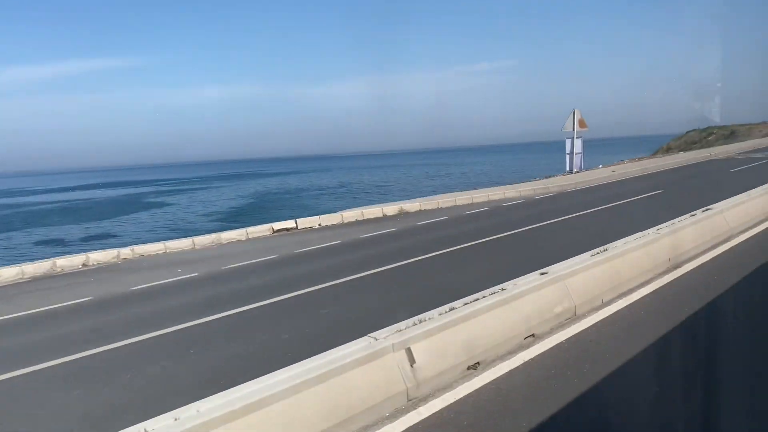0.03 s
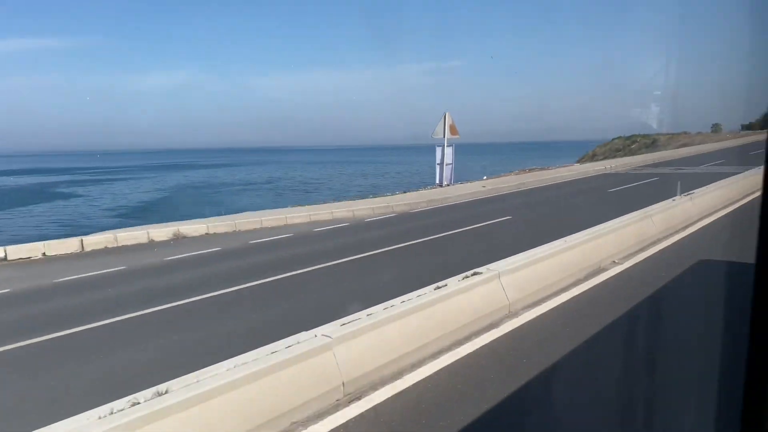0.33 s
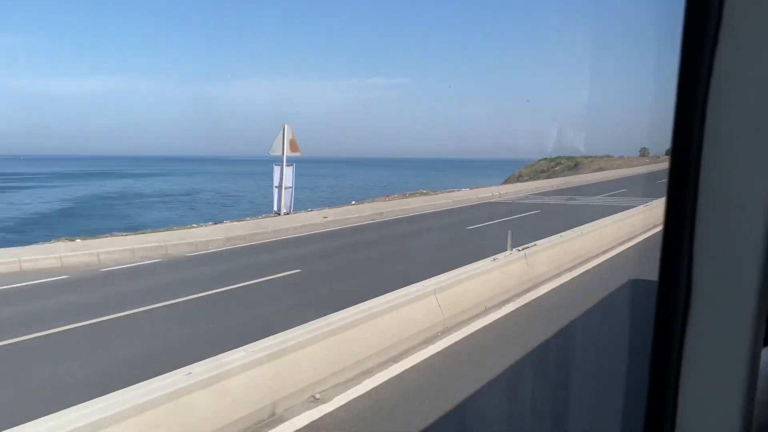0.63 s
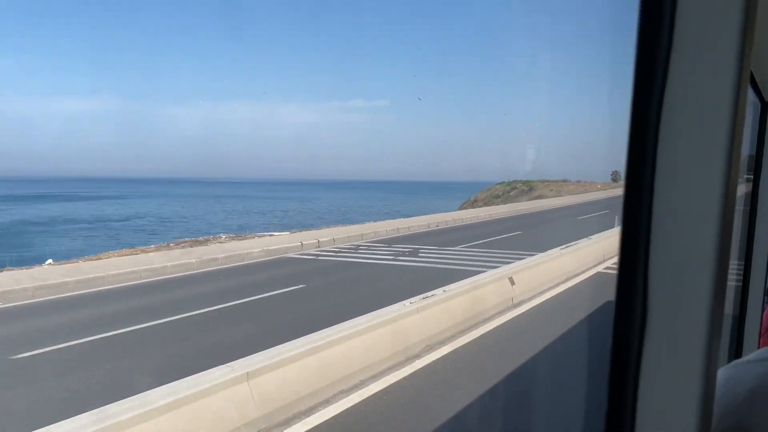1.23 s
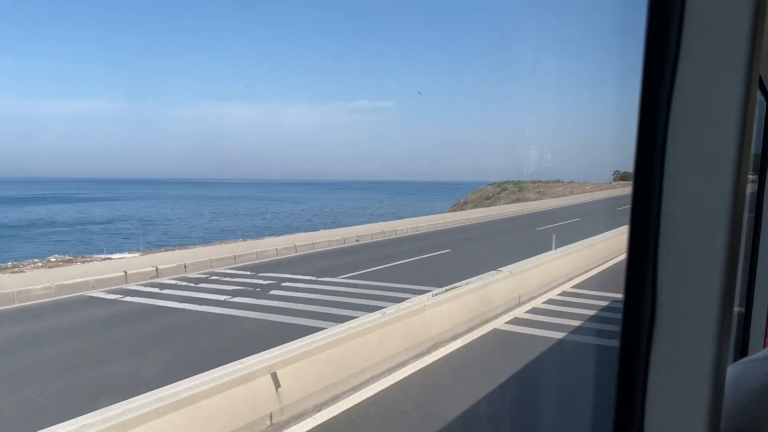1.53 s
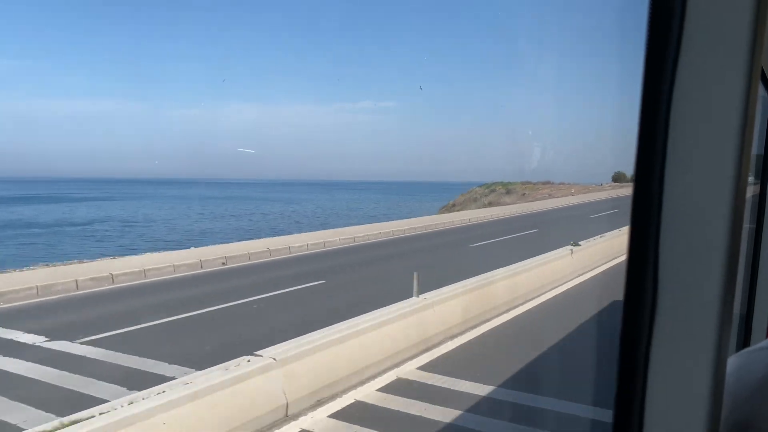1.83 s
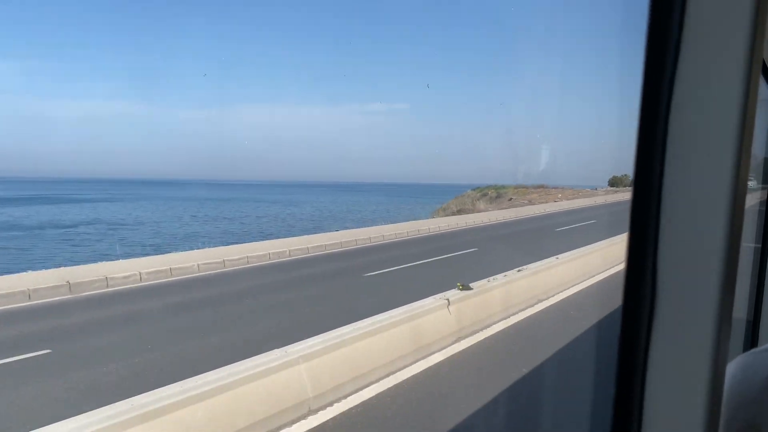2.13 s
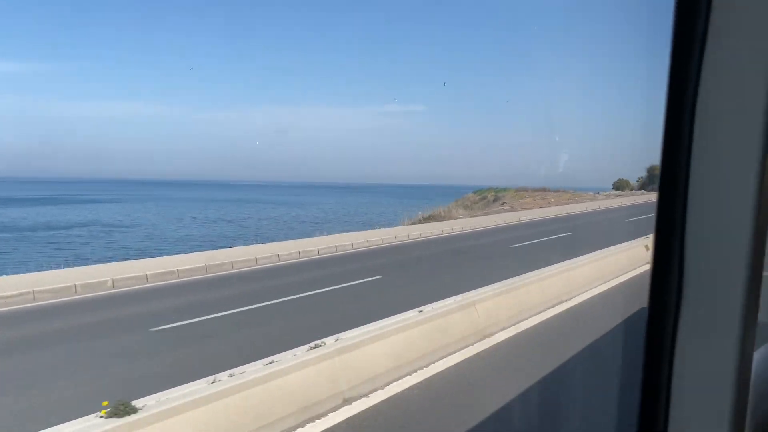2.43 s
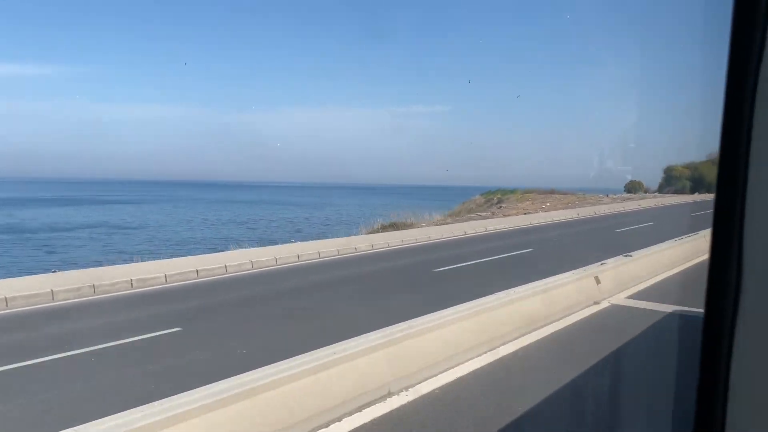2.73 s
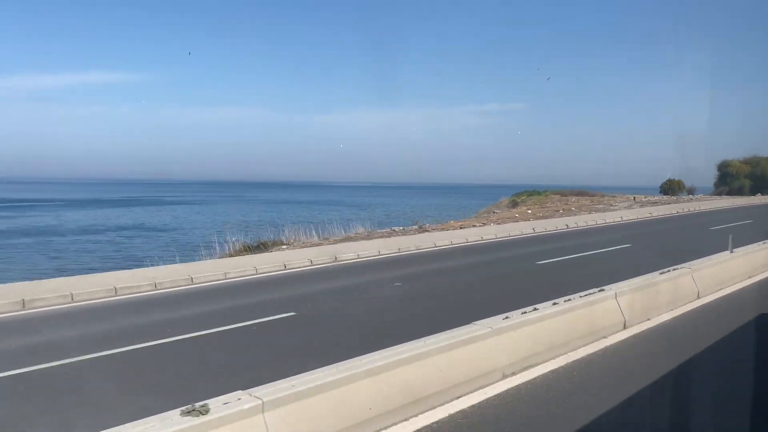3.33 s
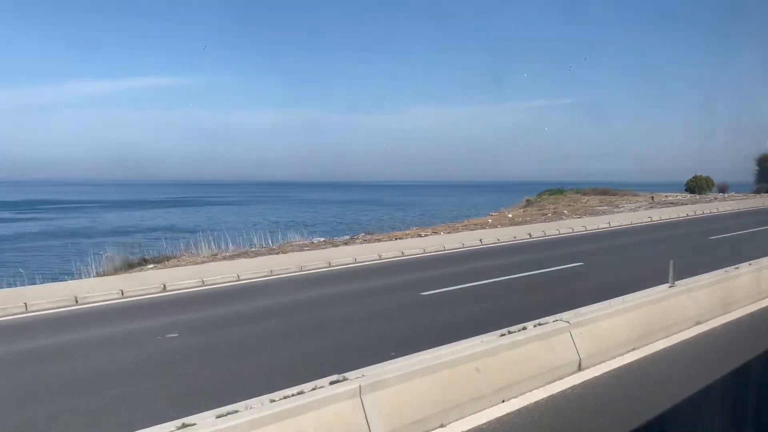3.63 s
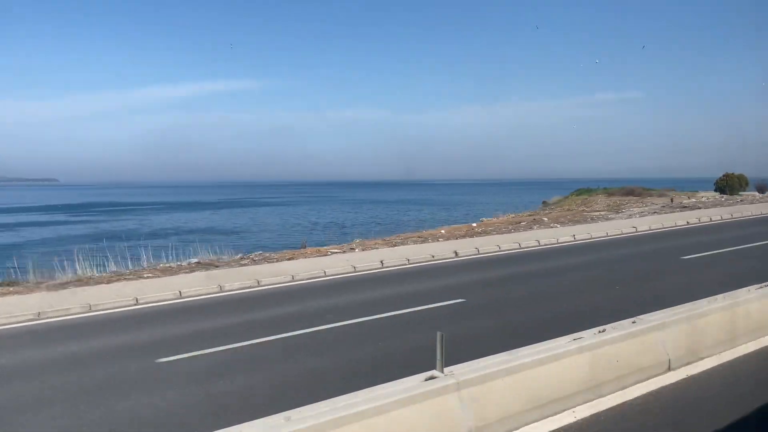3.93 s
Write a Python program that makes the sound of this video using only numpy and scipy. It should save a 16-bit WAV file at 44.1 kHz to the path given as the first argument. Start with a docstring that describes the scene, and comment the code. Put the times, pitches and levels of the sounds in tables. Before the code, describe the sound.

A deep bus rumble runs throughout, heard from inside, with tyre roar, window hiss and a faint, slightly sinking whine. From 0.5 to 1.1 seconds something rustles softly and air ruffles the microphone. Tyres growl from about 1.1 to 2.3 seconds, with low throbs and a brief panel rattle around 2. Another puff comes at 2.4. Trim ticks lightly on and off, with a tiny squeak near 3.4.

```python
"""A window seat in a bus slowing slightly on a coast road, stereo microphones. From the start the road
shakes the body into a deep boom, tyres roar, air hisses past the window and the driveline hums and whines,
sinking with the speed. In the first second something rustles close by, trim starts to tick and a draught
ruffles the left microphone. Then comes a rough patch: tyres growl, wheels throb, a loose panel buzzes.
After one more puff of air a faint upper whine comes in, and near the end a fitting squeaks."""
import sys
import numpy as np
from scipy import signal
from scipy.fft import rfft, irfft
from scipy.io import wavfile
from scipy.ndimage import uniform_filter1d

SR = 44100
rng = np.random.default_rng(int(sys.argv[2]) if len(sys.argv) > 2 else 0)


def generate_wav(signal):
    """Clip the signal to [-1, 1] and save it as 16-bit WAV at the path in sys.argv[1]."""
    frames = np.transpose(np.atleast_2d(signal))
    scaled = np.clip(frames, -1, 1) * 32767
    pcm = np.round(scaled).astype(np.int16)
    wavfile.write(sys.argv[1], SR, pcm)


N = 176400

# How hard the road shakes the body. Each row: time in seconds, level in dB.
ROAD_SHAKE = [(0, -22), (.5, -24), (.9, -22.5), (1.4, -20.5), (1.57, -22.5), (1.69, -21.5), (1.88, -18),
              (2.07, -18), (2.25, -20.5), (2.7, -22.5), (3.05, -20.5), (3.4, -17.5), (3.58, -19),
              (4, -23.5)]


def undb(db):
    """Decibels to gain."""
    return 10 ** (np.asarray(db) / 20)


def times():
    """Time of every sample in seconds."""
    return np.arange(N) / SR


def curve(rows):
    """Points joined by straight lines in time."""
    return np.interp(times(), *np.array(rows).T)


def over_hz(rows, column=1):
    """One column of a table spread over the frequency bins."""
    rows = np.array(rows)
    return np.interp(np.log(np.arange(N // 2 + 1) * SR / N + 1e-9), np.log(rows[:, 0]), rows[:, column])


def colour(x, spectrum):
    """Filter by a spectrum that falls away beyond its ends; rms 1."""
    (lo, lo_db), (hi, hi_db) = spectrum[0], spectrum[-1]
    closed = [(lo / 2, lo_db - 40)] + list(spectrum) + [(hi * 2, hi_db - 40), (hi * 8, hi_db - 100)]
    y = irfft(rfft(x) * undb(over_hz(closed)), N)
    return y / np.std(y)


def noise(channels=2):
    """Unrelated white noises."""
    return rng.standard_normal((channels, N))


def walk(rate):
    """Random levels held 1 / rate seconds and smoothed twice; spread near 1."""
    hold = int(SR / rate)
    steps = np.repeat(rng.standard_normal(N // hold + 1), hold)
    return 1.3 * uniform_filter1d(uniform_filter1d(steps, hold), hold)[:N]


def pan(db):
    """Left and right gains, the left higher by db."""
    return undb(np.array([[db], [-db]]) / 2)


def fade(start, decay):
    """A sudden start that dies away."""
    age = times() - start
    return (age >= 0) * np.exp(-np.abs(age) / decay)


def swell(centre, half_width):
    """A bell-shaped rise and fall."""
    return np.exp(-.5 * ((times() - centre) / half_width) ** 2)


def cabin_ripple(spacing_hz=21.91):
    """The uneven response of the cabin's many close resonances, smoothing out in the treble."""
    hz = np.arange(N // 2 + 1) * SR / N
    bumps = np.interp(hz / spacing_hz, np.arange(2000), rng.standard_normal(2000))
    depth_db = 3.5 * np.clip(hz / 500 - .5, 0, 1) / (1 + (hz / 4000) ** 2)
    return undb(depth_db * bumps)


def cabin_field(spectrum):
    """Noise as the two microphones hear it, partly shared and out of phase; their mean has rms 1."""
    # The pair in the cabin. Each row: frequency in Hz, left minus right in dB, coherence from 0 to 1,
    # left lead in radians.
    mic_pair = [(27.8, -3, 0.7, -2), (68, -6, 0.96, -0.64), (132, -9.5, .92, -0.8), (206, -13, 1, -2.1),
                (390, -4, 0.9, -1.5), (730, 1, 0.4, -3), (1240, -.5, 0.4, -5), (2000, -3.5, 0.2, -2.5),
                (3000, -2.5, 0.17, 0.5), (6000, 4, .15, 1.5), (12000, -5, .15, -2.5)]
    shared, separate = rfft(noise()) * cabin_ripple()
    tilt = undb(over_hz(mic_pair, column=1) / 2)
    coherence = np.clip(over_hz(mic_pair, column=2), 0, 1)
    lead = over_hz(mic_pair, column=3)
    left = tilt * (coherence * shared * np.exp(1j * lead) + np.sqrt(1 - coherence ** 2) * separate)
    sum_power = tilt ** 2 + tilt ** -2 + 2 * coherence * np.cos(lead)
    field = colour(irfft(np.array([left, shared / tilt]) / np.sqrt(sum_power), N), spectrum)
    return field / np.std(field.mean(axis=0))


def sizzle(whistle_hz=12000, flutter_hz=75):
    """A faint sizzle and a thin fluttering whistle that rise with the shaking."""
    # The sizzle's colour. Each row: frequency in Hz, density in dB.
    spectrum = [(6000, 4), (9000, -4), (11500, -1)]
    t, shake = times(), curve(ROAD_SHAKE)
    shake = shake - shake.mean()
    hiss = colour(noise(), spectrum) * undb(-81.5 + 2.3 * shake + 1.5 * walk(130))
    flutter = np.sin(2 * np.pi * flutter_hz * t + 2.2 * walk(45))
    whistle = flutter * np.sin(2 * np.pi * whistle_hz * t)
    return hiss + whistle * undb(-85 + .7 * shake + 2.5 * walk(40))


def squeak(at=3.372, hz=6500):
    """One tiny squeak of a fitting."""
    return undb(-55.5) * swell(at, 0.0073) * np.sin(2 * np.pi * hz * times() + .4 * walk(700))


def rustle():
    """Something soft brushes by close to the microphones, in fine grains with a few bright strokes."""
    # The soft rub. Each row: time in seconds, level in dB.
    rub_level = [(.45, -91), (.54, -59), (.68, -66), (.74, -57), (.85, -57), (.91, -58.5), (.98, -53),
                 (1.03, -55.5), (1.09, -80)]
    # Bright strokes. Each row: centre in seconds, half-width in seconds, level in dB.
    strokes = [(.54, .004, -70), (.585, 0.016, -72), (.66, 0.0091, -71), (0.807, 0.014, -67.5)]
    # Colours of rub and strokes. Each row: frequency in Hz, density in dB.
    rub_spectrum = [(900, 2.5), (2300, 3), (3500, -4), (5000, -6.5), (6500, -14.5), (8700, -16),
                    (10500, -24)]
    stroke_spectrum = [(6000, -14), (8600, 1), (9600, -5), (11000, -17)]
    rub = colour(noise(), rub_spectrum) * undb(curve(rub_level))
    stroke_gain = sum(undb(db) * swell(at, half_width) for at, half_width, db in strokes)
    bright = colour(noise(), stroke_spectrum) * stroke_gain
    grain = undb(1.5 * walk(180))
    return (rub + bright) * pan(-2) * grain


def trim(decay_s=0.0022, cabin_decay_s=0.018, contacts_per_s=1500):
    """Dry plastic ticks with a brief cabin tail, over the fine random chatter of the fittings."""
    # Trim ticks. Each row: start in seconds, level in dB, rough pitch in Hz, left minus right in dB.
    ticks = [(.693, -58, 4500, -8), (.963, -52, 2400, -1), (0.971, -56, 7000, 5), (1.427, -55.5, 6850, 7),
             (1.456, -64, 6500, 12), (1.556, -63, 6800, 11), (1.5898, -48.5, 5340, 6.5),
             (1.597, -55.5, 5460, 4), (1.68, -53.5, 5400, 3), (2.06, -54.5, 4400, 14),
             (2.0825, -51, 6070, 6), (2.4434, -46.5, 4400, -0.5), (2.447, -55, 5000, -4),
             (2.459, -63, 5000, 1.5), (2.529, -49.5, 5100, -2.5), (2.6452, -60, 8000, -9.5),
             (2.938, -55, 5830, -7), (2.946, -52, 5000, 1), (3.031, -45.5, 4600, 0), (3.037, -56, 5500, 5),
             (3.05, -57, 4480, 0), (3.78, -50.5, 4400, -2)]
    # Soft plastic dulls every tick. Each row: frequency in Hz, gain in dB.
    dulling = [(1000, 1.5), (8000, 1), (9500, -8.5), (11500, -23)]
    # The chatter's colour. Each row: frequency in Hz, density in dB.
    chatter_spectrum = [(2000, -9), (4000, 4.5), (7000, -1.5), (9000, -9), (11500, -24)]
    # Its rise and fall. Each row: time in seconds, level in dB.
    chatter_level = [(0, -77), (.4, -77), (.55, -72), (1.0, -72), (1.12, -92), (1.6, -76), (1.75, -71.5),
                     (2.08, -58.5), (2.38, -77.5), (2.5, -61.5), (2.7, -90), (3.05, -62.5), (3.2, -70.5),
                     (3.5, -64), (4, -74.5)]
    out, hiss = 0, colour(noise(), dulling)
    for at, db, hz, side_db in ticks:
        band = [(hz * 2 ** (k / 2), -3 * k * k) for k in (-1.5, 0.2, -1.03, 2.0, 0.5)]
        envelope = fade(at, decay_s) + undb(-12.5) * fade(at, cabin_decay_s)
        out = out + colour(hiss, band) * pan(side_db) * undb(db) * envelope
    contacts = (rng.random(N) < contacts_per_s / SR) * undb(2.5 * rng.standard_normal(N))
    rattle = signal.lfilter([1], [1, -np.exp(-1 / (decay_s * SR))], contacts)
    return out + colour(noise() * rattle, chatter_spectrum) * undb(curve(chatter_level))


def loose_panel(tail_s=.035):
    """A loose panel chafes in short bursts; each one sets its modes clinking."""
    # Bursts. Each row: centre in seconds, half-width in seconds, level in dB, left minus right in dB.
    bursts = [(2.048, .003, -42, 0), (2.085, .003, -37.5, 1), (2.176, .004, -44, -1)]
    # The chafing's colour. Each row: frequency in Hz, density in dB.
    spectrum = [(700, -7), (1170, 5), (1700, -5.5), (2450, 3), (2750, -13.5), (3200, -4.5), (3650, -18),
                (4100, -16.5), (6000, -31)]
    # The panel's modes. Each row: frequency in Hz, seconds to fall by 60 dB, level in dB.
    modes = [(2051, .043, -50.5), (2465, .035, -39.5), (3198, .04, -54.5)]
    push = sum(undb(db) * pan(side_db) * (swell(at, half_width) + undb(-10) * fade(at, tail_s))
               for at, half_width, db, side_db in bursts)
    out, t = push * colour(noise() + 0.46 * noise(channels=1), spectrum), times()
    for at, half_width, _, side_db in bursts:
        for hz, t60, db in modes:
            ring = np.where(t < at, swell(at, half_width), fade(at, t60 / np.log(1000)))
            phase = 2 * np.pi * hz * t + rng.uniform(0, np.pi / 2, (2, 1))
            out = out + undb(db) * pan(side_db) * ring * np.sin(phase)
    return out


def draught():
    """Short, fluttering puffs of air right on the left microphone."""
    # Puffs. Each row: start in seconds, length in seconds, level in dB.
    puffs = [(0.785, 0.15, -27), (0.953, 0.15, -27), (2.408, 0.079, -29.5)]
    # Their colour. Each row: frequency in Hz, density in dB.
    spectrum = [(40, -26), (100, 1), (240, 3.5), (380, -3.5), (600, -29.5), (1200, -34)]
    t = times()
    gate = sum(undb(db) * ((t > at) & (t < at + length)) for at, length, db in puffs)
    left = colour(noise(channels=1)[0], spectrum) * uniform_filter1d(gate, size=1500)
    return np.array([left * undb(2.6 * walk(28.3)), np.zeros(N)])


def window_air():
    """Air hisses past the window beside the seat, fluttering a little."""
    # The hiss's colour. Each row: frequency in Hz, density in dB.
    spectrum = [(700, -19), (1300, -1.5), (1600, 1), (1820, -3), (2020, 2), (2150, 0), (2340, 3), (2470, 3),
                (2620, 1.5), (2850, -1.5), (3200, -4), (3450, -7.5), (4900, -10), (5700, -17),
                (6600, -19.5), (8500, -29.5), (11000, -42.5)]
    # Its rise and fall. Each row: time in seconds, relative level in dB.
    level = [(0, -55), (.5, -57), (1.0, -55.5), (1.13, -58), (1.7, -55.5), (2.35, -56.5), (2.55, -56),
             (2.8, -55.5), (3.4, -54), (4, -57)]
    return cabin_field(spectrum) * undb(curve(level) - 1.12 + 1.3 * walk(25))


def tyre_roar():
    """The tyres roar on the road, heard from inside."""
    # The roar's colour. Each row: frequency in Hz, density in dB.
    spectrum = [(250, -13), (450, -0.5), (540, -14.5), (595, 4.5), (660, -3), (770, 2.5), (850, -2),
                (935, 0.5), (1060, -5), (1185, -2.5), (1250, -6.5), (1330, -5.5), (1500, -12),
                (1700, -17.5), (2500, -29)]
    # Its rise and fall. Each row: time in seconds, relative level in dB.
    level = [(0, -44), (.5, -44.5), (.72, -42.5), (.8, -45.5), (1.3, -46.5), (2.05, -45.5), (2.4, -46),
             (2.8, -47.5), (3.3, -45), (3.8, -49.5), (4, -50)]
    return cabin_field(spectrum) * undb(curve(level) - 1.5 + 1.4 * walk(30))


def coarse_asphalt():
    """The tyres growl over a stretch of rougher surface."""
    # The growl's colour. Each row: frequency in Hz, density in dB.
    spectrum = [(240, -9.5), (340, 5), (420, 2.5), (490, 3), (550, -2), (620, -1.5), (800, -1.5),
                (1000, -15), (1400, -22)]
    # Its rise and fall. Each row: time in seconds, level in dB.
    level = [(1.0, -56), (1.15, -39.5), (1.5, -40), (2.0, -39), (2.28, -40.5), (2.45, -53), (2.7, -64.5)]
    tread = noise(channels=1) + 0.97 * noise()
    in_cabin = irfft(rfft(tread) * cabin_ripple(), N)
    return colour(in_cabin, spectrum) * undb(curve(level) + 0.96 * walk(35))


def wall_drone():
    """The floor and walls drone around the seat."""
    # The drone's colour. Each row: frequency in Hz, density in dB.
    spectrum = [(70, -12), (120, 6), (145, 2.5), (165, 0.5), (200, -0.5), (240, -3.5), (275, -8),
                (345, -11.5), (400, -18), (500, -17), (800, -44.5)]
    # Its rise and fall. Each row: time in seconds, level in dB.
    level = [(0, -28), (1.05, -32), (1.2, -32), (1.55, -35), (1.9, -30.5), (2.1, -29.5), (2.3, -32),
             (2.9, -28), (3.3, -28), (3.5, -29), (3.68, -26.5), (4, -29.5)]
    return cabin_field(spectrum) * undb(curve(level) + 0.98 * walk(14))


def driveline(wander=.007, upper_ratio=4.43):
    """A gear whine, stronger on the right, and low hums, all locked to the road speed."""
    # The whine sinks with the speed. Each row: time in seconds, pitch in Hz.
    whine_pitch = [(0, 322.1), (1, 315.9), (1.9, 308.4), (2.75, 301.4), (3.25, 297.8), (4, 288.5)]
    # The main whine and a faint upper one. Each row: time in seconds, relative level in dB.
    whine_level = [(.1, -38), (.19, -27.5), (.42, -30), (.48, -43), (.63, -30), (.76, -34.5), (1.06, -30.5),
                   (1.14, -39), (1.55, -36.5), (1.68, -43), (1.88, -30), (2.08, -40), (2.23, -35),
                   (2.44, -31.5), (2.55, -44), (2.69, -26.5), (2.78, -26.5), (2.99, -36), (3.12, -28.5),
                   (3.24, -27), (3.32, -41), (3.43, -40), (3.52, -28), (3.63, -33), (3.76, -31),
                   (3.85, -44), (3.95, -34)]
    upper_level = [(2.1, -77), (2.6, -53), (3.3, -55), (4, -64)]
    # Low hums. Each row: starting pitch in Hz, level in dB.
    hums = [(36.5, -33), (51.5, -27), (66, -28.5), (77.5, -26.5), (101, -39), (132, -35), (153, -46)]
    hz, whine_db, shake = curve(whine_pitch), curve(whine_level), curve(ROAD_SHAKE)
    turn = 2 * np.pi * np.cumsum(hz * (1 + wander * walk(35))) / SR
    right = np.sin(turn) + undb(-28.5) * np.sin(2 * turn)
    right *= undb(whine_db + 2 + 2 * walk(70))
    left = np.sin(turn - 1.6 + 1.1 * walk(2))
    left *= undb(-41.5 + 0.33 * (whine_db - whine_db.mean()) + 2 * walk(12))
    upper = np.sin(upper_ratio * turn + 0.89 * walk(60)) * undb(curve(upper_level) + 3.3 * walk(30))
    out = np.array([left, right + upper])
    for hum_hz, db in hums:
        phase = turn * hum_hz / hz[0] + .5 * walk(5.09) + rng.uniform(0, 2 * np.pi)
        gain = undb(db + walk(4.917) + 0.46 * (shake - shake.mean()))
        out = out + gain * pan(-9.0) * np.array([np.sin(phase - .9), np.sin(phase)])
    return np.sqrt(2) * out  # rms levels to sine peaks


def wheel_throb(wander=0.016):
    """Patches of rippled road beat the wheels, and the cabin swells with a firm low note."""
    # Throbs. Each row: centre in seconds, half-width in seconds, level in dB, pitch in Hz.
    throbs = [(1.705, .055, -12.5, 73), (2.06, .045, -14.5, 73), (2.228, .038, -13.5, 77)]
    out, left_lag = 0, np.array([[.9], [0]])
    for at, half_width, db, hz in throbs:
        turn = 2 * np.pi * np.cumsum(hz * (1 + wander * walk(25))) / SR - left_lag
        note = np.sin(turn) + undb(-11.5) * np.sin(2 * turn)
        out = out + note * undb(db) * swell(at, half_width)
    return out * pan(-7.5)


def body_boom():
    """The road shakes the bus body into a deep boom that shifts between the microphones."""
    # The boom's colour. Each row: frequency in Hz, density in dB.
    spectrum = [(12, -23), (24, -10), (33, -13.5), (40, -7), (48, -1.5), (60, 2), (75, -3), (92, -2),
                (115, -11.5), (150, -20), (260, -50.5)]
    # Where it sits. Each row: time in seconds, extra left minus right in dB.
    balance = [(0, 7), (.9, 11), (1.15, -1.5), (2.4, -3), (4, -1.5)]
    boom = cabin_field(spectrum) * undb(curve(ROAD_SHAKE) - 0.34)
    return boom * undb(np.array([[1], [-1]]) * curve(balance) / 2)


def scene():
    """Everything heard from the window seat."""
    rolling = body_boom() + wall_drone() + tyre_roar() + window_air()
    rolling = rolling + coarse_asphalt() + wheel_throb() + driveline()
    return rolling + draught() + rustle() + trim() + loose_panel() + squeak() + sizzle()


def record(dry, top_hz=12300):
    """The phone's microphones, with the top cut steeply."""
    return signal.sosfilt(signal.ellip(8, .2, 70, top_hz, fs=SR, output="sos"), dry)


dry = scene()
out = record(dry)
generate_wav(out)
```